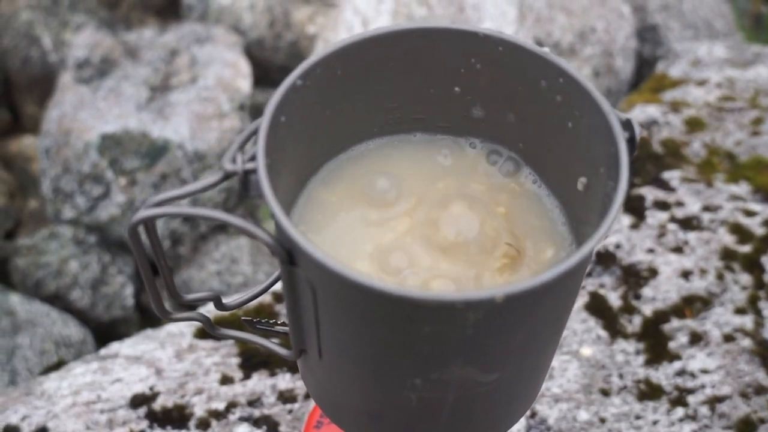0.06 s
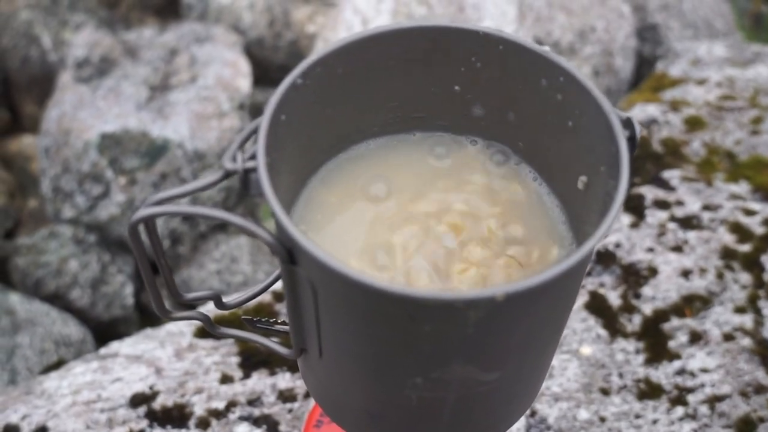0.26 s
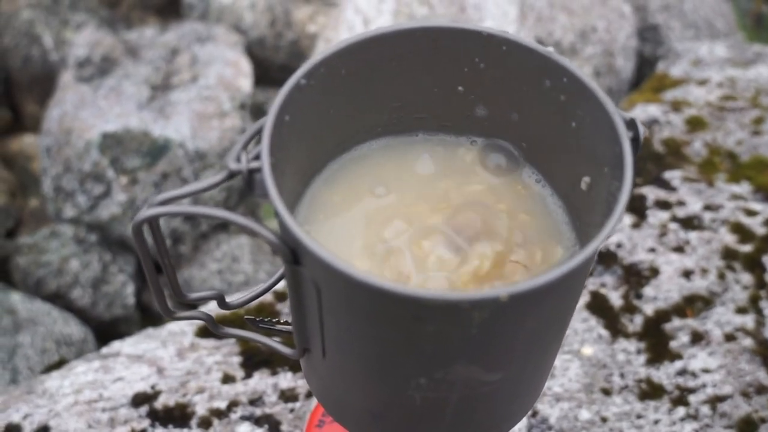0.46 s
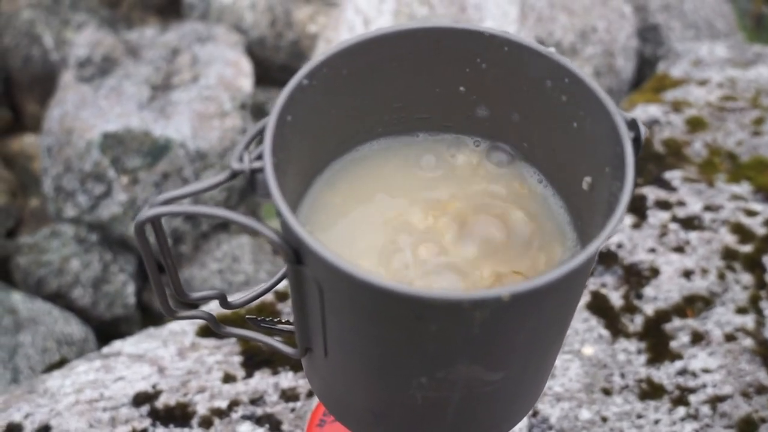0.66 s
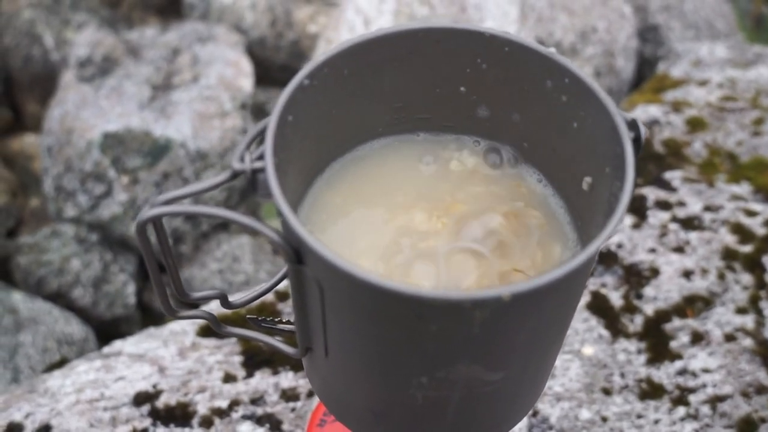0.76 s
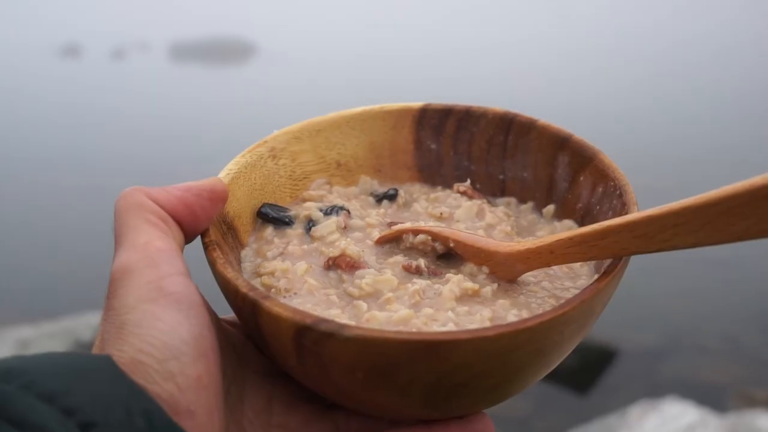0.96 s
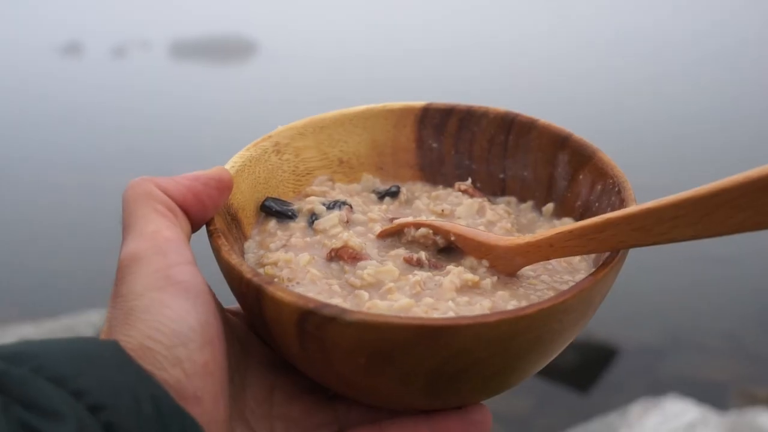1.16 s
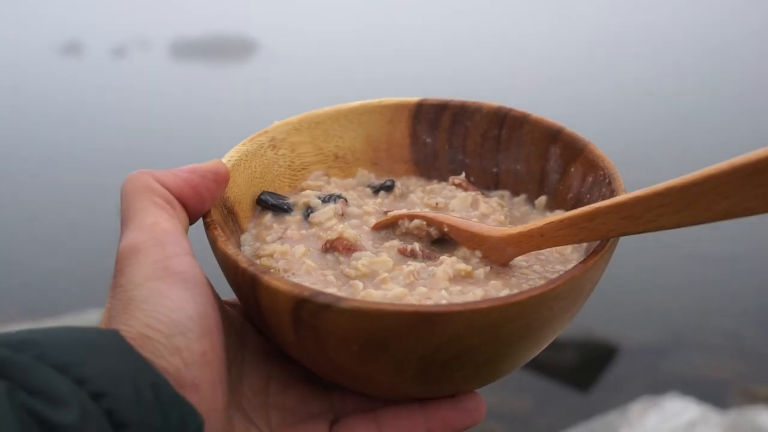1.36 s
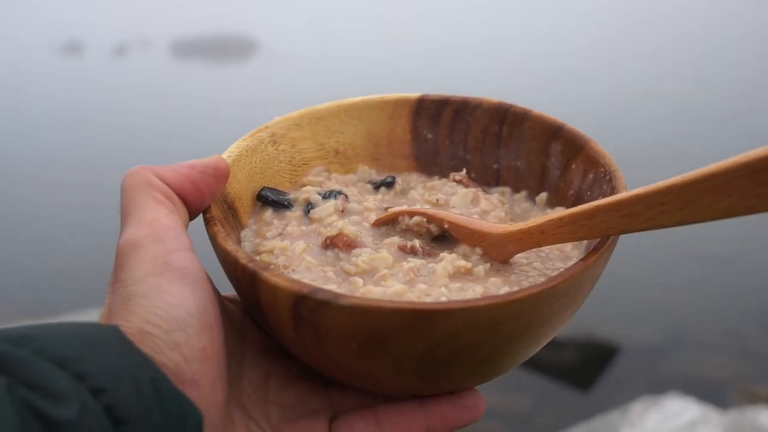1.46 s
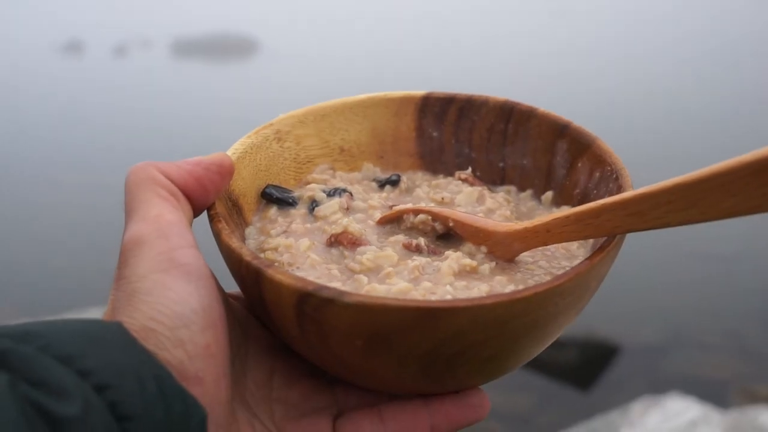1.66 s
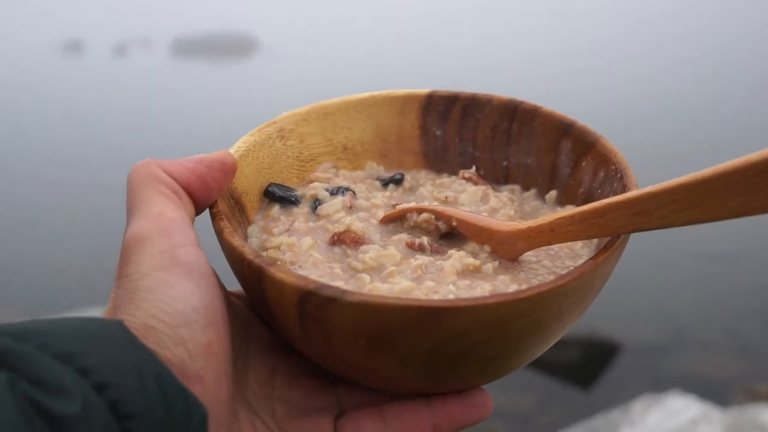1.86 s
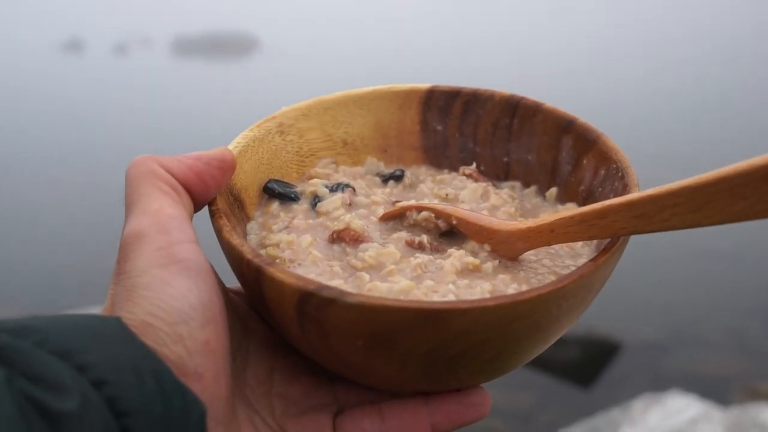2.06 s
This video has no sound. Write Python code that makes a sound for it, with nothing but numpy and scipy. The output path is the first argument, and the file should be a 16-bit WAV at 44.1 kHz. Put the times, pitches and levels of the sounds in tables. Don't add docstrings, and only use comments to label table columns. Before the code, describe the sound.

Thick oatmeal boils close up in a small metal pot outdoors, irregular wet plops and spits over a fluttering flame and gas hiss; just before one second it cuts to near silence and faint open lake air.

```python
import sys
import numpy as np
from scipy import signal
from scipy.fft import rfft, irfft, next_fast_len
from scipy.io import wavfile
from scipy.ndimage import map_coordinates

SR = 44100
rng = np.random.default_rng(int(sys.argv[2]) if len(sys.argv) > 2 else 0)


def master_out(mix):
    frames = np.transpose(np.atleast_2d(mix))
    ceiling = np.clip(frames, -1, 1)
    pcm = np.round(ceiling * 32767).astype(np.int16)
    wavfile.write(sys.argv[1], SR, pcm)


def volts(x):
    e = np.asarray(x, float) / 20
    return 10 ** e


N = 93271
TIME = np.arange(N) / SR


def unit(x):
    return x / np.sqrt(np.mean(x ** 2) + 1e-20)


def along(points, hz):
    point_hz, value = np.transpose(points)
    return np.interp(np.log(hz + 1), np.log(point_hz + 1), value)


def wobble(rate):
    knots = rng.standard_normal(int(N * rate / SR) + 4)
    return map_coordinates(knots, [np.arange(N) * rate / SR])


def filtered(x, response):
    size = next_fast_len(N + 8192)
    return irfft(rfft(x, size) * response(np.fft.rfftfreq(size, 1 / SR)), size)[..., :N]


def resonances(table):
    def response(f):
        return sum(volts(db) * 1j * f * width / (hz * hz - f * f + 1j * f * width) for hz, width, db in table)
    return response


def rush(spectrum, alike):
    def mid_side(hz):
        angle = np.arccos(np.clip(along(alike, hz), -1, 1)) / 2
        return volts(along(spectrum, hz)) * [np.cos(angle), np.sin(angle)]
    mid, side = filtered(rng.standard_normal((2, N)), mid_side)
    return np.array([mid + side, mid - side]) / np.sqrt(np.mean(mid ** 2 + side ** 2))


def place(s, shapes, k):
    at = np.round(s * SR).astype(int)[:, None] + k
    inside = (at >= 0) & (at < N)
    return np.bincount(at[inside], shapes[inside], N)


# (frequency [Hz], level [dB])
WHINE_TONES = [(13606, -77.5), (13667, -79.5)]


def camera_whine():
    total = 0
    for hz, db in WHINE_TONES:
        level = volts(db + 4.0 + 0.8 * wobble(30))
        total = total + level * np.sin(2 * np.pi * hz * TIME + 0.61 * wobble(14))
    return total


# (frequency [Hz], level [dB])
LAKE_COLOUR = [(15, -37), (25, -7), (123, -4.5), (542, -5), (654, -3.5), (749, -6), (8050, -18.5),
               (13400, -16.5), (15800, -18)]
# (frequency [Hz], correlation)
LAKE_ALIKE = [(60, .77), (150, .5), (380, .35), (950, .45), (2400, .3), (6000, .03)]
# (frequency [Hz], lead [rad])
LAKE_LEAD = [(60, 0), (150, .9), (520, 2.5), (1500, 2.9), (6000, 2.6)]


def lake_air():
    def lead(hz):
        return np.exp(0.5j * along(LAKE_LEAD, hz) * np.array([[1], [-1]]))
    level = volts(-59.5 + 0.58 * wobble(3.3))
    pan_db = 0.5
    return level * filtered(rush(LAKE_COLOUR, LAKE_ALIKE), lead) * volts([[-pan_db], [pan_db]])


# (frequency [Hz], level [dB])
BREEZE_COLOUR = [(15, -27.5), (30, -7.5), (100, 0.5), (400, -7.5), (900, -24), (3000, -62.5)]


def breeze():
    return volts(-67) * rush(BREEZE_COLOUR, [(60, 0.45)])


# (frequency [Hz], level [dB])
JET_COLOUR = [(500, -2.5), (2300, -2.5), (5000, -4), (11000, -5.5), (14000, -2.5), (16000, -6)]


def gas_jet():
    level = volts(-61 + 0.32 * wobble(4.0))
    return level * rush(JET_COLOUR, [(500, 0.19), (4000, 0.042)])


# (frequency [Hz], level [dB])
FLAME_COLOUR = [(20, -29.5), (45, -19.5), (110, -6.5), (150, -9), (200, -2.5), (330, -17), (1000, -17.5),
                (5000, -42.5)]


def flame():
    noise = unit(filtered(rng.standard_normal(N), lambda hz: volts(along(FLAME_COLOUR, hz))))
    sink_db = 1.5 * np.clip((TIME - 0.74) / 0.13, 0, 1)
    return volts(-53.5 + 1.33 * wobble(19.3) - sink_db) * noise


# (time [s], level [dB])
STEAM_SWELL = [
    (.70, -77),
    (.78, -71.5),
    (.86, -67),
    (.9, -66.5),
]
# (frequency [Hz], width [Hz], level [dB])
STEAM_BANDS = [(10300, 370, 1), (11280, 760, 1), (12200, 340, -2)]


def steam_whistle():
    whistle = rng.standard_normal(N)
    for _ in range(2):
        whistle = filtered(whistle, resonances(STEAM_BANDS))
    return volts(np.interp(TIME, *np.transpose(STEAM_SWELL), left=-120)) * unit(whistle)


# (time [s], peak level [dB], length [s], tilt from dull to bright [dB])
FILM_TEARS = [(0.2493, -33.5, 0.0011, -12), (0.2537, -32.5, 0.0008, -2), (0.2552, -31, 0.00054, -2),
              (0.408, -45.5, .0015, 1), (0.4088, -43.5, 0.00065, 2), (0.499, -63.5, .0004, -2.5),
              (0.5124, -35.5, 0.00023, -0.5), (0.515, -53.5, 0.0042, -1), (0.5228, -33.5, 0.0032, 4),
              (0.526, -26.5, 0.0005, -6), (0.5276, -32.5, 0.00042, 13), (0.5298, -19.5, 0.00032, 4.5),
              (0.532, -35.5, 0.0011, 1), (0.6058, -41.5, .001, 3), (0.876, -47.5, 0.00087, -1),
              (.152, -69, .001, 6), (1.301, -56, .001, 6), (1.3105, -55, 0.0013, 7.5)]
# (frequency [Hz], level [dB])
SPIT_COLOUR = [(900, -7), (2300, 2.5), (3300, -5), (5000, -3), (6300, -8), (9500, 0), (12500, -11.5),
               (16000, -9.5)]


def spits():
    s, db, length, tilt_db = np.transpose(FILM_TEARS)
    k = np.arange(-400, 500)
    u = k / SR / length[:, None]
    envelope = np.exp(-np.where(u < 0, 2 * u * u, u))
    suction_click = 2.74 * np.exp(-(k / 1.9) ** 2)
    spray = envelope * (rng.standard_normal((len(s), len(k))) - suction_click)
    dull = place(s, volts(db - 3.5 - tilt_db)[:, None] * spray, k)
    bright = place(s, volts(db - 3.5 + tilt_db)[:, None] * spray, k)

    def colour(hz):
        low = 1 / (1 + (hz / 6500) ** 4)
        return volts(along(SPIT_COLOUR, hz)) * [low, 1 - low]
    return filtered(np.array([dull, bright]), colour).sum(axis=0)


def pops(s, db, hz, cycles):
    k = np.arange(-700, 700)
    turns = k / SR * hz[:, None]
    v = turns / np.atleast_1d(cycles)[:, None]
    bell = np.exp(-np.where(v < 0, v / 0.62, v) ** 2)
    glide = 0.063 * turns * turns / 2
    return place(s, volts(db)[:, None] * bell * np.cos(2 * np.pi * (turns + glide)), k)


# (time [s], peak level [dB], pitch [Hz])
STEAM_POCKETS = [(.01, -47, 195), (.078, -43, 212), (0.099, -43.5, 201), (0.119, -44, 213),
                 (.18, -48.5, 166), (0.211, -48.5, 150), (.25, -40.5, 207), (.29, -44, 193),
                 (0.301, -46, 192), (.34, -45, 183), (.39, -52, 98), (.417, -45.5, 169), (.449, -46, 230),
                 (.49, -51, 201), (.518, -42, 220), (.565, -48, 205.4), (0.614, -44.5, 170),
                 (.66, -46.5, 196), (.697, -45, 130), (.745, -48, 209), (.776, -47, 204.5),
                 (.815, -45.5, 191), (.866, -50, 203)]


def thumps():
    s, db, hz = np.transpose(STEAM_POCKETS)
    return pops(s, db, hz, cycles=1.18)


def crowd(rate, hz, spread, cycles, db, tail_db):
    draw = rng.random((rate, 4))
    s = draw[:, 0]
    size_db = -tail_db * np.log(0.17 + draw[:, 1]) + 2 * wobble(14.0)[(s * SR).astype(int)]
    bell = np.sqrt(-2 * np.log(draw[:, 2])) * np.cos(2 * np.pi * draw[:, 3])
    return pops(s, db + size_db, hz * np.exp(spread * bell), cycles)


# (time [s], peak level [dB], pitch [Hz], width [cycles])
BUBBLE_BURSTS = [(0.0007, -20, 994, 1), (0.0031, -24.5, 1060, 1.28), (0.0068, -40.5, 1056, 2),
                 (0.0909, -47, 820, 0.4), (0.0945, -27, 724, 0.85), (0.1068, -21.5, 1010, 1.46),
                 (0.1122, -37, 1200, 0.55), (0.1163, -33, 1140, 0.79), (0.118, -17.5, 1210, 1.13),
                 (0.1226, -20.5, 1170, 0.59), (0.2038, -35, 495, 1.2), (0.2095, -33, 700, 1.54),
                 (0.2417, -44, 1160, 0.42), (0.2452, -39, 1260, 0.7), (0.249, -19.5, 1300, 0.72),
                 (0.2533, -29, 990, 1.1), (0.2553, -29.5, 1080, 2.6), (0.3597, -30.5, 950, 0.87),
                 (0.377, -35.5, 450, 0.37), (0.3786, -43, 730, 0.8), (0.381, -42.5, 1100, 0.78),
                 (0.3866, -38, 1100, 0.72), (0.3889, -23.5, 1000, 0.86), (0.4728, -22, 900, 1.4),
                 (0.4762, -36, 1050, 0.97), (0.495, -43.5, 1480, 1.8), (0.5, -52, 1500, 1.1),
                 (0.5025, -30.5, 1560, 0.68),
                 (0.5085, -28, 960, 0.68), (0.5118, -29, 1100, 1.4), (0.5142, -31.5, 990, 1.0),
               (0.5173, -27, 974, 0.56), (0.5204, -34, 1057, 0.56), (0.5243, -32, 1130, 0.81),
               (0.5268, -24.5, 1050, 0.55), (0.53, -24.5, 1130, 2.37), (0.606, -37.5, 1080, 1.3),
               (0.6185, -47, 1010, 2.2), (0.6219, -36, 1140, 1.9), (0.6348, -25, 896, 0.98),
               (0.6376, -34.5, 693, 0.7), (0.6438, -34, 525, 0.93), (0.6508, -39, 1000, 1.0),
               (0.6558, -33.5, 752, 1.8), (0.7307, -24.5, 990, 0.99), (0.7319, -52, 2740, 2.2),
               (0.775, -39.5, 1080, 1.5), (0.8309, -33, 640, 1.44), (0.8335, -40.5, 648, 1.2),
               (0.836, -24.5, 935, 0.99), (0.8387, -41.5, 900, 0.83), (0.851, -38, 905, 0.44),
               (0.8563, -32.5, 623, 0.8), (0.8587, -28.5, 815, 0.73), (0.863, -38, 910, 0.95),
               (0.8642, -23.5, 926, 0.76), (0.8659, -29, 1080, 1.2), (0.8736, -42, 1080, 1.3)]
# (time [s], pitch [Hz])
FAINT_BURSTS = [(0.055, 1100), (0.24, 320), (0.57, 1050), (0.79, 800), (0.51, 490), (.198, 430),
                (.217, 1100), (.2665, 860), (.294, 1070), (0.23, 1350), (.885, 640), (0.27, 690),
                (0.32, 1190), (.6963, 850), (0.94, 665), (0.89, 1200), (.316, 1260), (0.37, 420),
                (0.35, 1380), (.794, 970)]


def bursts():
    faint = [(s, -47.5, hz, 1) for s, hz in FAINT_BURSTS]
    s, db, hz, width = np.transpose(BUBBLE_BURSTS + faint)
    width = np.clip(width, 0.3, 3)
    snap = pops(s, db - 17 - 7.5 * width, 2.045 * hz, cycles=1.4)
    late, size, pitch = rng.standard_normal((3, len(s)))
    brood_db = -41 + 0.43 * (db + 27.5) + 3 * size
    brood = pops(s + 0.006 * late, brood_db, hz * np.exp(0.25 * pitch), cycles=0.92)
    little = crowd(rate=290, hz=840, spread=0.32, cycles=0.7, db=-61, tail_db=3.5)
    heavy = crowd(rate=90, hz=390, spread=0.22, cycles=0.75, db=-59, tail_db=6)
    return pops(s, db, hz, width) + snap + brood + little + heavy


# (frequency [Hz], width [Hz], level [dB])
POT_AIR = [(1080, 89, 0.5), (1300, 86, -14.5), (1977, 120, -0.5), (2605, 290, 4)]


def boil():
    burst = bursts()
    return volts(-0.6) * burst + volts(-3.5) * filtered(burst, resonances(POT_AIR)) + thumps()


# (frequency [Hz], lead [rad])
POT_LEFT_LEAD = [(80, 0.24), (260, 0.84), (430, 1.22), (700, 1.34), (2000, 1.66), (4300, 1), (9000, -1.2),
                 (15000, -1.4)]
# (frequency [Hz], level [dB])
POT_BALANCE = [(100, 0.5), (430, -2), (1000, -3.5), (1400, -4.5), (5000, -9), (9000, -6.5), (13000, -17.5)]


def ports(x):
    def sides(hz):
        left = volts(along(POT_BALANCE, hz) / 2) * np.exp(0.5j * along(POT_LEFT_LEAD, hz))
        return np.array([left, 1 / left])
    return 1.216 * filtered(x, sides)


def scene():
    across = ports(spits()) + camera_whine()
    stove = ports(boil() + flame() + steam_whistle()) + gas_jet() + breeze() + across
    lake = lake_air() + across
    cut_s, cut_len_s = 0.894, 0.0024
    stove_gain = np.clip((cut_s - TIME) / cut_len_s + 0.5, 0, 1)
    remnant = volts(-36) * (TIME < cut_s + 0.012)
    fade_s, fade_len_s, fade_bend = 0.91, 0.22, 1.55
    lake_gain = np.clip((TIME - fade_s) / fade_len_s, 0, 1) ** fade_bend
    return stove * (stove_gain + remnant * (1 - stove_gain)) + lake * lake_gain


def roll_off(x):
    return signal.sosfilt(signal.butter(12, 15900, fs=SR, output="sos"), x)


def record(dry):
    mix = filtered(dry, lambda hz: hz < 15900)
    return roll_off(mix)


dry = scene()
out = record(dry)
master_out(out)
```